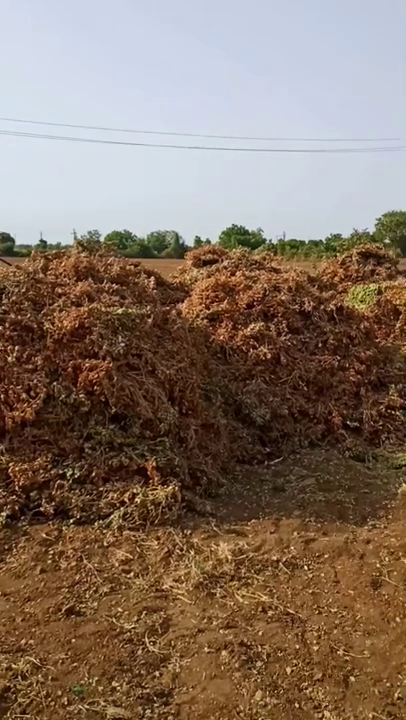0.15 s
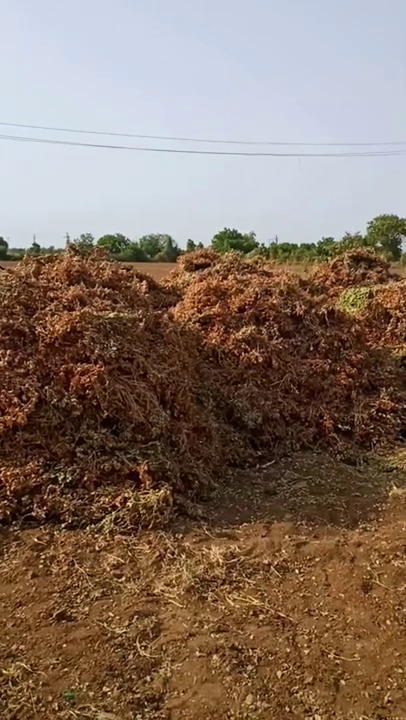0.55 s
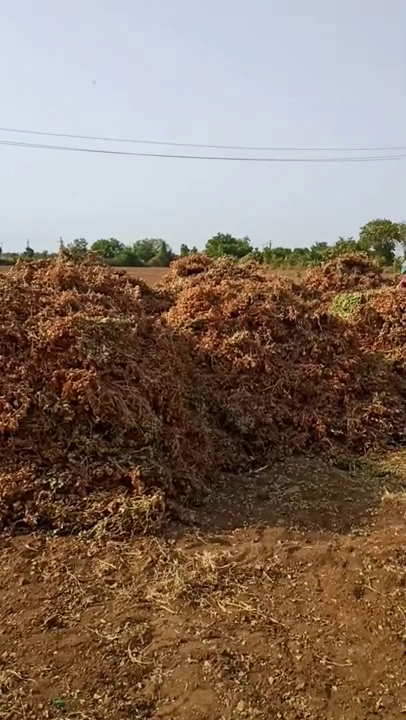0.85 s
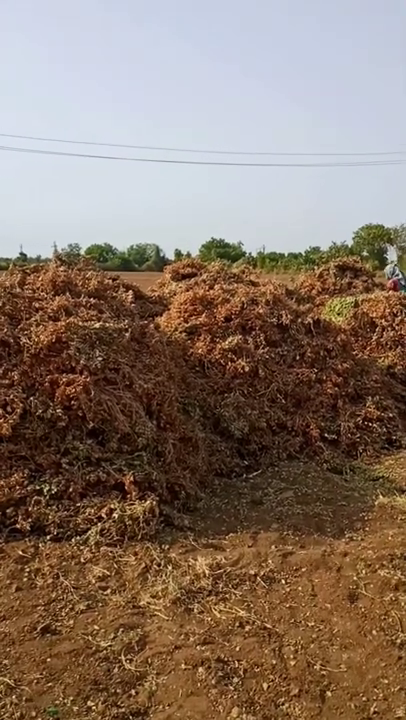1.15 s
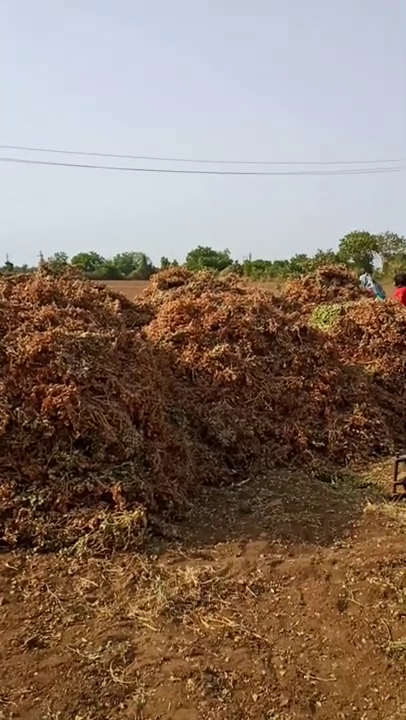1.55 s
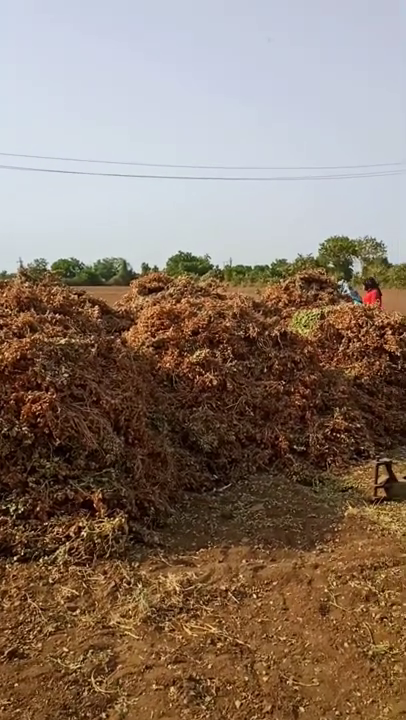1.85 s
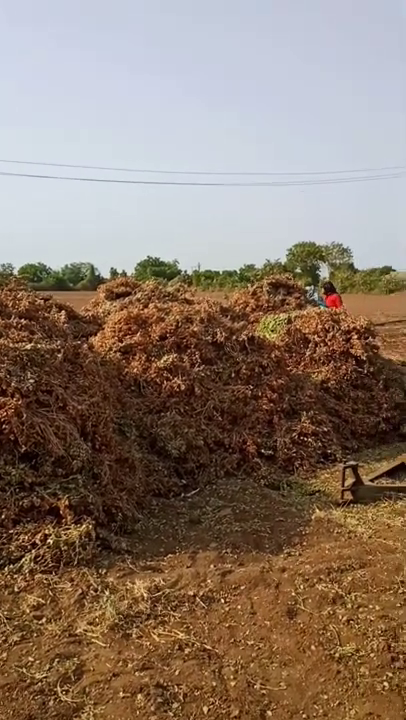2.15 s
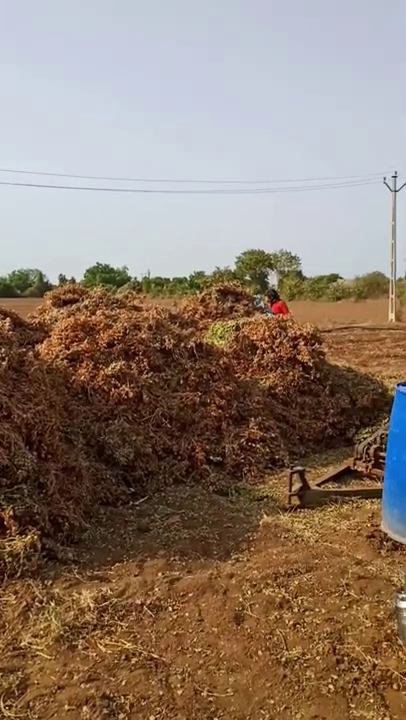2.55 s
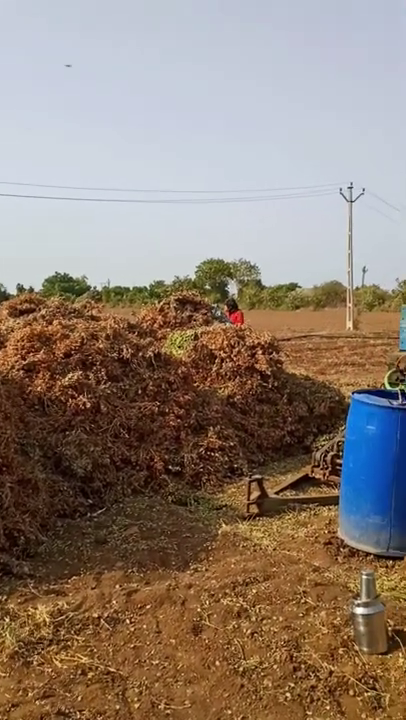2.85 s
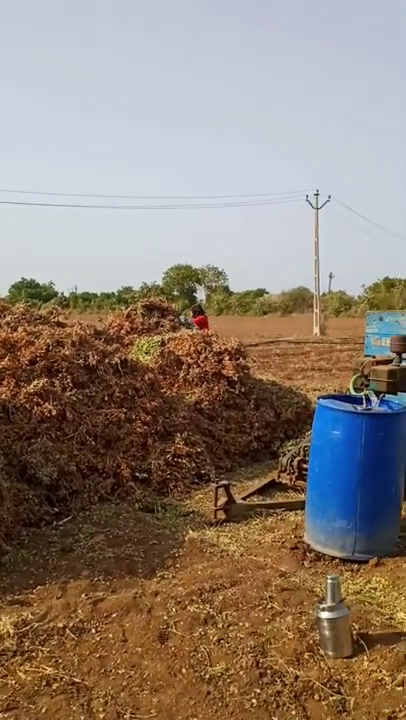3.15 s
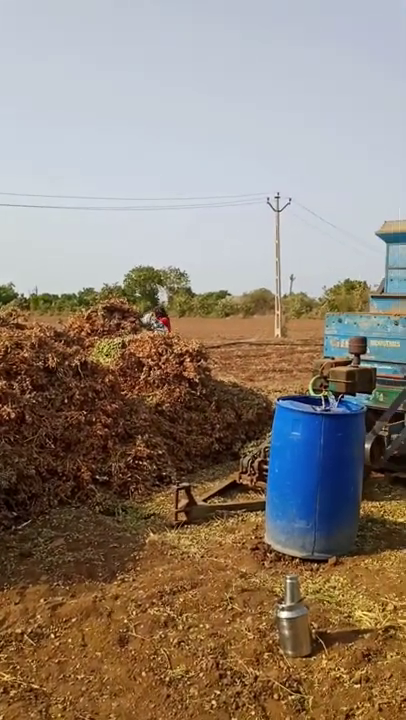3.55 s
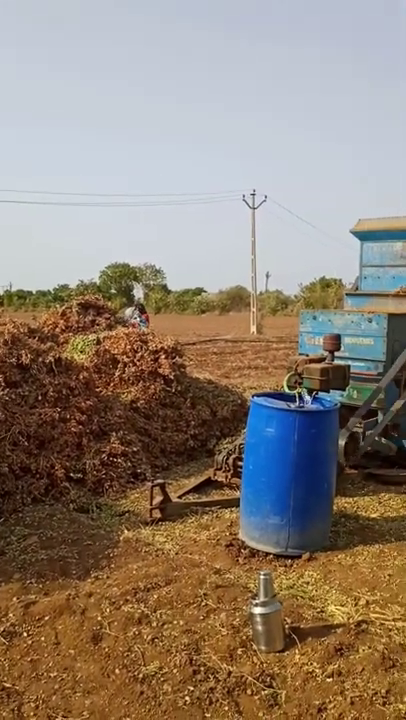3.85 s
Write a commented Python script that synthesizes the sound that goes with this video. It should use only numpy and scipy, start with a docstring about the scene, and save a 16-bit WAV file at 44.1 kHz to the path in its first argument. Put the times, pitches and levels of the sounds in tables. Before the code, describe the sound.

A threshing machine fades in quickly from about 0.2 seconds and runs until the end at 4 seconds. Its slow engine thumps and chuffs nearly six times a second over a steady roar. Sharp knocks on the sheet-metal housing come about three times a second, with lighter taps and rattling between. Low wind gusts buffet the microphone, strongest from about 1.1 to 2 seconds.

```python
"""Threshing machine in an open field

A slow single-cylinder engine thumps into its exhaust pipe and chuffs four times a cycle over a steady
roar. Once a turn a drive part knocks on the sheet-metal housing, whose modes also ring as loose parts
rattle. Gusts of wind buffet the microphone. The sound fades in."""
import sys
import numpy as np
from scipy import signal
from scipy.fft import rfft, irfft
from scipy.io import wavfile

SR = 44100
rng = np.random.default_rng(int(sys.argv[2]) if len(sys.argv) > 2 else 0)


def digitize_waveform(pressure):
    """Quantize a signal to 16-bit integers and store it at the path in sys.argv[1].

    Rows of a 2-D input are taken as channels; values are limited to [-1, 1].
    """
    field = np.atleast_2d(pressure).T
    bounded = np.clip(field, -1, 1)
    quanta = np.round(bounded * 32767).astype(np.int16)
    wavfile.write(sys.argv[1], SR, quanta)


N = 176400

# modes of the housing: (frequency [Hz], gain [dB], T60 [s])
HOUSING_MODES = [(2624, -12, 0.04), (2840, -8, 0.02), (3190, -8, 0.011), (3720, -10, 0.012),
                 (4170, -14, 0.0094), (5620, 0, 0.0094), (6180, 9, 0.0076), (6940, 7, 0.011),
                 (8960, 14, 0.004), (10500, 6, 0.0026), (14100, 10, 0.0019)]
# engine firings: (time [s], thump gain [dB], chuff gain [dB])
ENGINE_FIRINGS = [(0.165, -42.5, 5.5), (0.339, -19, 1.5), (0.513, -16, -2), (0.69, -16.5, -8.5),
                  (0.868, -17.5, -3.5), (1.042, -15.5, -7), (1.222, -15, -4.5), (1.395, -24, 5.5),
                  (1.561, -21, 1), (1.747, -15, -1), (1.912, -30, 4.5), (2.089, -18, 4.5),
                  (2.272, -17.5, -4.5), (2.436, -15, -3), (2.623, -22, -2.5), (2.793, -18.5, 0),
                  (2.973, -18, -5), (3.145, -15, -1), (3.316, -17.5, 0.5), (3.489, -20, -0.5),
                  (3.664, -24, -4), (3.842, -16.5, 0)]


def amp(db):
    return 10 ** (np.asarray(db) / 20)


def in_time(rows):
    """Linear interpolation of each column over time."""
    s, *columns = np.transpose(rows)
    return [np.interp(np.arange(N) / SR, s, c) for c in columns]


def at_hz(hz, points_hz, values):
    """Interpolation between curves on a log-frequency axis."""
    k = np.interp(np.log(hz), np.log(points_hz), np.arange(len(points_hz)))
    low = min(int(k), len(points_hz) - 2)
    return values[low] + (k - low) * (values[low + 1] - values[low])


def drift(rate_hz):
    """Low-passed noise: a slow wander of rms 1."""
    r = np.exp(-80 * np.pi * rate_hz / SR)
    slow = signal.lfilter([1], [1, -2 * r, r * r], rng.standard_normal(N // 40 + 2002))[2000:]
    return np.interp(np.arange(N) / 40, np.arange(len(slow)), slow / np.sqrt(np.mean(slow ** 2)))


def noise_bands(spectrum, centres):
    """A filter bank splits shaped noise of rms 1 into overlapping bands."""
    log_hz = np.log(np.maximum(np.arange(N // 2 + 1) * SR / N, 1))
    hz, db = np.transpose(spectrum)
    shaped = rfft(rng.standard_normal(N)) * amp(np.interp(log_hz, np.log(hz), db, -90, -90))
    shaped /= np.std(irfft(shaped, N))
    return [irfft(shaped * np.interp(log_hz, np.log(centres), peak), N) for peak in np.eye(len(centres))]


def ring(clicks, hz, t60):
    """Damped resonator: a unit impulse starts a decaying unit sine."""
    r, w = amp(-60 / (t60 * SR)), 2 * np.pi * hz / SR
    return signal.lfilter([0, np.sin(w)], [1, -2 * r * np.cos(w), r * r], clicks + 1e-18)


def puff(clicks, rise_s, fall_s):
    """Double-exponential envelope: each impulse swells and dies away."""
    a, b = np.exp(-1 / (rise_s * SR)), np.exp(-1 / (fall_s * SR))
    return signal.lfilter([0, 2 * (b - a)], [1, -a - b, a * b], clicks + 1e-18)


def wind():
    """Turbulence at the microphone makes lumpy low noise, brighter in some gusts."""
    # gusts: (time [s], level [dB], extra gain at 500 Hz [dB])
    gusts = [(0.3, -27, 4), (0.39, -25, -8), (0.69, -27.5, 1.5), (0.77, -19, 1), (0.94, -25.5, -5),
             (1.1, -25.5, -5), (1.15, -18, 0), (1.2, -23, -10), (1.31, -25.5, 7), (1.35, -15, -6),
             (1.38, -20.5, -6), (1.5, -14, -8.5), (1.62, -24.5, -3), (1.65, -18, -5), (1.69, -27.5, 2),
             (1.86, -22.5, -0.5), (1.9, -10, -3.5), (1.94, -20.5, 4), (1.97, -14, -3.5), (2.1, -25.5, -8),
             (2.24, -21.5, -3), (2.35, -26, -1.5), (2.41, -17, -17), (2.43, -26, -11), (2.475, -21.5, -4.5),
             (2.8, -26, 1), (2.98, -24, 0), (3.29, -27.5, 3.5), (3.57, -27, 0), (3.92, -26.5, -2.5),
             (4.0, -20.5, -13)]
    # wind spectrum: (frequency [Hz], relative density [dB])
    spectrum = [(12, -50), (20, -49), (40, -21), (80, -1), (102, -0.5), (187, -3), (316, -12), (409, -15),
                (500, -25), (650, -23), (1100, -120)]
    level_db, bright_db = in_time(gusts)
    centres, shared = np.geomspace(25, 500, 7), drift(25)
    out = 0
    for hz, band in zip(centres, noise_bands(spectrum, centres)):
        lumps_db = 1.5 * (shared + 0.4 * drift(31))
        out += band * amp(lumps_db + at_hz(hz, [200, 500], [0, bright_db]))
    return amp(level_db) * out


def buffets():
    """Slaps of air on the microphone are heavily damped pressure oscillations."""
    # slaps: (time [s], gain [dB], frequency [Hz])
    slaps = [(1.130, -4, 111), (1.3444, 1, 115), (1.420, -8, 400), (1.446, 3, 279), (1.467, 2.5, 173),
             (1.885, -4, 190), (2.809, -6.5, 70)]
    pressure = sum(amp(db) * ring(np.arange(N) == int(s * SR), hz, t60=2.4 / hz) for s, db, hz in slaps)
    return -signal.lfilter([.07], [1, -.93], pressure)  # low-pass


def rattle():
    """Random impacts of loose parts excite the housing's modes in clumps of short scuffs."""
    scuff_s, mid_boost_db = .003, 18
    sizes = amp(2.5 * np.minimum(rng.exponential(1, N), 3))
    ticks = sizes * (rng.random(N) < 110 * amp(4 * drift(10)) / SR)  # around 110 a second
    scuffs = signal.lfilter([1], [1, -np.exp(-1 / (scuff_s * SR))], ticks + 1e-18)
    out = 0
    for hz, db, t60 in HOUSING_MODES:
        gain = amp(db + mid_boost_db * (2300 < hz < 4800))
        out += gain * ring(scuffs * rng.standard_normal(N), hz, t60)
    return amp(-74) * out


def chuff_envelopes():
    """Four chuffs follow each firing; their envelopes, one per band, decay faster in the treble."""
    # chuffs of one cycle: (delay [s], gain over the roar at 0.8, 2.8, 7 and 14 kHz [dB])
    chuffs = [(.006, -3, 2.5, 12, 16), (.056, -3.5, 1, 7.5, -6), (.101, -33, -37, 11, 7),
              (.138, -21.5, -45, -3, 0)]
    jitter_s, scatter_db, falls_s = .0015, 2.5, [.028, .028, .0045, .0045]
    chuffs = np.array(chuffs)
    fired_s, _, extra_db = np.transpose(ENGINE_FIRINGS)[..., None]
    chance = rng.standard_normal((len(fired_s), len(chuffs), 3))
    s = fired_s + chuffs[:, 0] + jitter_s * chance[..., 0]
    scatter = chance[..., [1, 1, 2, 2]].transpose(2, 0, 1)  # bands vary in pairs
    clicks = np.zeros((4, N + SR))
    clicks[:, (s * SR).astype(int)] = amp(chuffs[:, 1:].T[:, None] + extra_db + scatter_db * scatter)
    lifts = [puff(c[:N], rise_s=.0025, fall_s=fall) for c, fall in zip(clicks, falls_s)]
    lifts.insert(1, 0.026 * lifts[0])  # a gap at 1250 Hz
    return lifts


def engine_roar():
    """Amplitude modulation: each chuff lifts the bands of a steady roar by its own colour."""
    # roar spectrum: (frequency [Hz], relative density [dB])
    spectrum = [(180, -62), (300, -16), (432, 0), (485, -13.5), (733, -1), (1180, -11), (1260, -7.5),
                (1420, -13.5), (1670, -6), (2290, -14.5), (2750, -7.5), (3240, -18.5), (3760, -17.5),
                (5150, -30), (6000, -21.5), (9340, -28.5), (12400, -37), (13400, -21), (15500, -24.5)]
    # colour as the microphone turns: (time [s], gain at 4, 6.9, 11.54 and 14.1 kHz [dB])
    turning = [(.2, 1.5, 5, 8, 2), (.7, 0.5, 9.5, 3, 7.5), (1.2, -4, 3.5, 0, 2), (1.5, -2, 5.5, 1, -0.5),
               (2.1, -1, 7.5, -0.5, 4), (2.8, 3.5, 3.5, 5.5, 2), (3.2, 1, -1.5, 5, 0),
               (3.6, 1, -7, 13.5, -12), (4.0, -0.5, -5.5, 12.5, -14)]
    lifts = chuff_envelopes()
    colour, shared = [np.zeros(N)] + in_time(turning), drift(6.8)
    centres = np.geomspace(300, 15600, 18)
    out = 0
    for hz, band in zip(centres, noise_bands(spectrum, centres)):
        colour_db = at_hz(hz, [2060, 4000, 6900, 11540, 14100], colour)
        flicker_db = 2 * (0.23 * shared + drift(16.4))
        lift = at_hz(hz, [800, 1250, 2800, 7000, 14000], lifts)
        out += band * amp(colour_db + flicker_db) * (1 + lift)
    return amp(-35.5) * out


def exhaust_thumps():
    """Each firing drives the exhaust pipe's resonances with a double pressure pulse."""
    # pipe resonances: (frequency [Hz], gain [dB], T60 [s])
    pipe_modes = [(420, -5.5, 0.014), (603, -7.5, 0.013), (795, -8.5, 0.016)]
    s, db, _ = np.transpose(ENGINE_FIRINGS)
    out = 0
    for hz, mode_db, t60 in pipe_modes:
        pulses, vary = np.zeros(N), rng.standard_normal((len(s), 2))
        pulses[(s * SR).astype(int)] = amp(db + mode_db + 2 * vary[:, 0])
        pulses[((s + .003) * SR).astype(int)] = amp(db + mode_db) * vary[:, 1] * 1.36
        out += ring(pulses, hz, t60)
    return signal.lfilter([.15], [1, -.85], out)  # low-pass


def knocks():
    """Impact excitation: a drive part's brief burst of contacts rings the panel and housing modes."""
    # knocks: (time [s], gain [dB], struck panel mode [Hz], low panel mode [Hz],
    # gain of the low, high and top modes against the middle ones [dB])
    strikes = [(0.399, -17, 2520, 1720, -20, -9, -27), (0.413, -6.5, 2780, 1786, -2.5, -11, -32),
               (0.748, -9.5, 2640, 1880, -20, -17.5, -23), (1.0553, -3.5, 2915, 2050, -13, -16.5, -24),
               (1.0845, -22.5, 3640, 2080, 6, -11, -25), (1.285, -16.5, 3000, 2050, -10, -15, -26),
               (1.3918, -8, 2660, 1830, -25, -7, -17), (1.6975, -11.5, 2840, 2100, 0, -6.5, -15.5),
               (1.727, -22.5, 3930, 2160, 8, -14, -21), (1.7888, -18.5, 2800, 2050, -14, -15, -31),
               (1.9773, -16.5, 2820, 2030, -17, -19, -31), (2.035, -4, 2710, 2280, -24, -14.5, -20.5),
               (2.327, -15.5, 2900, 1900, -8, -15, -27.5), (2.3478, -6.5, 3006, 1760, -7.5, -10.5, -30),
               (2.6697, -3.5, 2610, 2250, -24, -23, -25.5), (2.8553, -16.5, 2900, 1760, -12, -18, -30),
               (2.9907, -7, 2850, 1720, -11, -15.5, -17), (3.035, -23, 3750, 1720, -10, -22, -30),
               (3.154, -25.5, 2720, 1770, 8.5, -16, -17), (3.2062, -18, 2980, 2050, -9, -26, -25),
               (3.321, -6.5, 2720, 2280, -6, -18, -15.5), (3.374, -19, 3580, 2050, -20, -22, -25),
               (3.4976, -15.5, 2700, 1750, -14, -42, -40), (3.55, -30, 2900, 1750, -12, -28, -35),
               (3.6377, -7.5, 3240, 2150, -5.5, -14, -24), (3.7335, -19, 3660, 1720, -4, -19, -25),
               (3.858, -21.5, 2820, 1730, -12, -26, -30), (3.9582, -4, 3030, 2277, -8, -21.5, -20.5)]
    contacts_per_s, detune, scatter_db = 6000, .02, 2
    t, out = np.arange(4000) / SR, np.zeros(N + SR)
    for s, db, panel_hz, low_hz, low_db, high_db, top_db in strikes:
        modes = HOUSING_MODES + [(hz, -0.5, .022) for hz in (panel_hz, low_hz)]
        vary, sound = rng.standard_normal((len(modes), 2)), 0
        vary[-2:] = 0  # no detuning or scatter for the panel modes
        for (hz, mode_db, t60), (tune, strength) in zip(modes, vary):
            chance, force = rng.random((2, len(t)))
            fed_s = .0045 * (2800 / hz) ** 0.28  # high modes are driven more briefly
            envelope = np.exp(-t / fed_s) * (1 - np.exp(-t / (0.36 * fed_s)))
            hits = (chance < contacts_per_s / SR) * (2 * force - 1) * envelope
            hits[0] = .7  # first contact
            colour_db = (low_db, 0, high_db, top_db)[np.searchsorted([2300, 4800, 7500], hz)]
            gain = amp(mode_db + colour_db + scatter_db * strength) / np.linalg.norm(hits)
            sound += gain * ring(hits, hz * (1 + detune * tune), t60)
        start = int(s * SR)
        out[start:start + len(t)] += amp(db - 5) * sound
    return out[:N]


def scene():
    """Superposition of machine and wind in one channel."""
    return (knocks() + rattle() + exhaust_thumps() + engine_roar() + wind() + buffets())[None]


def record(dry):
    """After a fade-in, saturation rounds the peaks and a low-pass cuts the top."""
    # fade-in: (time [s], gain [dB])
    fade_in = [(.158, -120), (.162, -24), (.21, -17), (.228, -8), (.3, -3.5), (.36, 0)]
    fade_db, = in_time(fade_in)
    soft = 1.287 * np.tanh(dry * amp(fade_db) / 1.13)
    return signal.sosfilt(signal.cheby2(18, 50, 15950, fs=SR, output="sos"), soft)


dry = scene()
out = record(dry)
digitize_waveform(out)
```